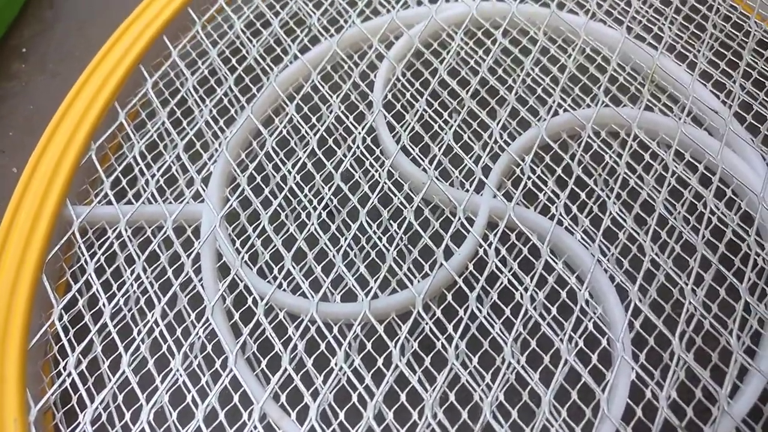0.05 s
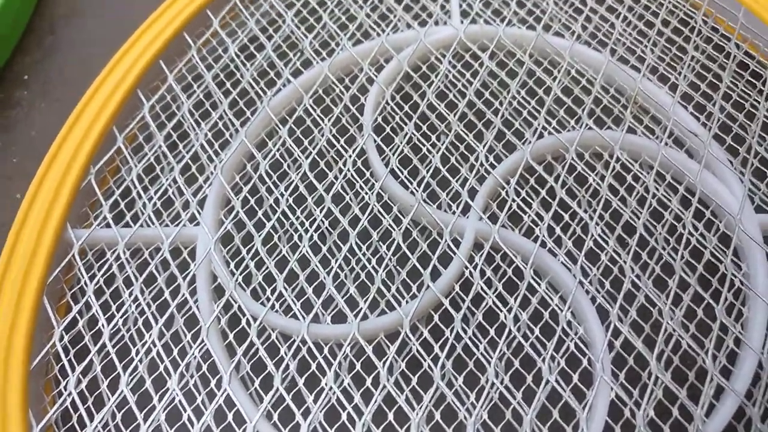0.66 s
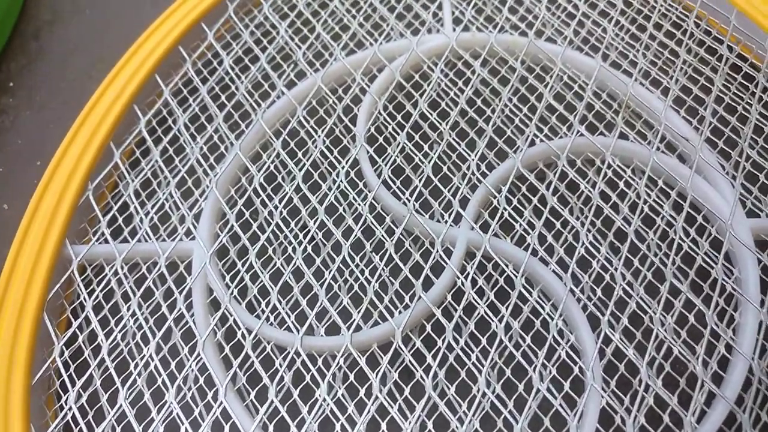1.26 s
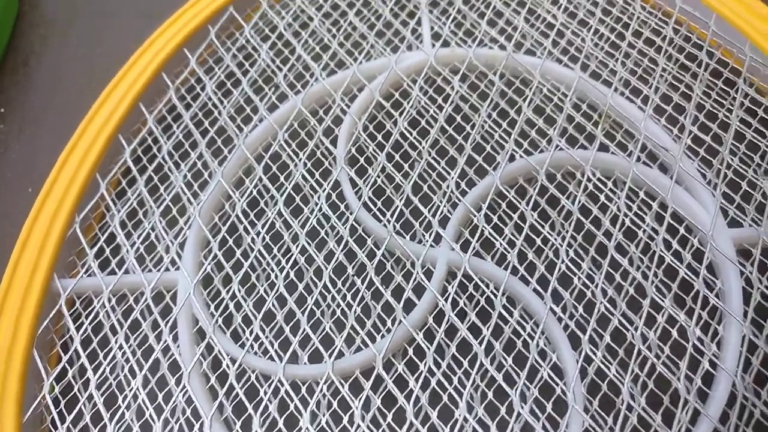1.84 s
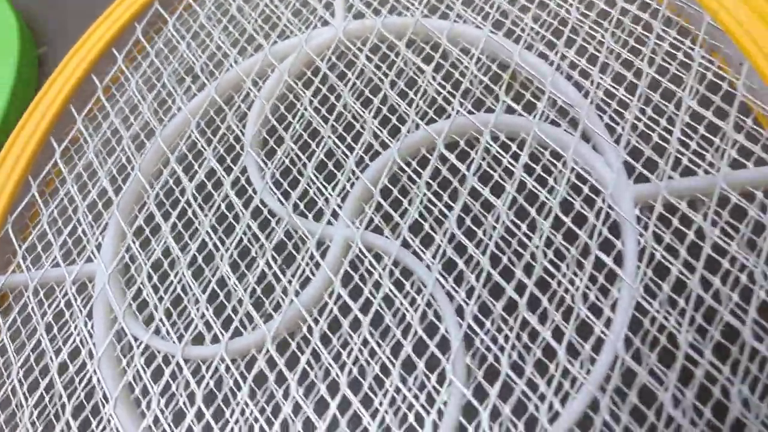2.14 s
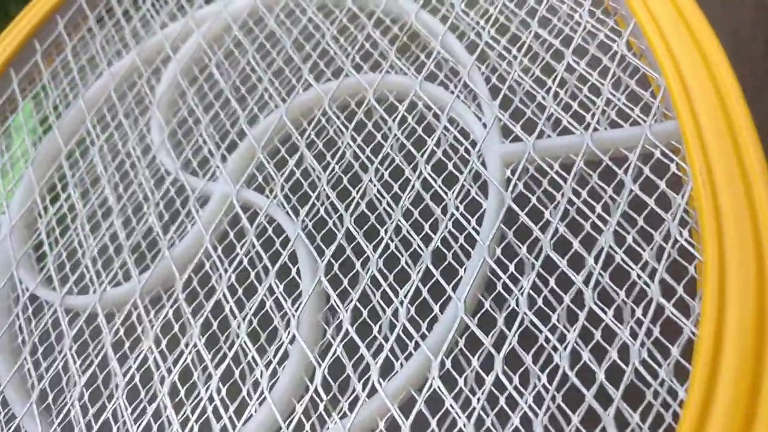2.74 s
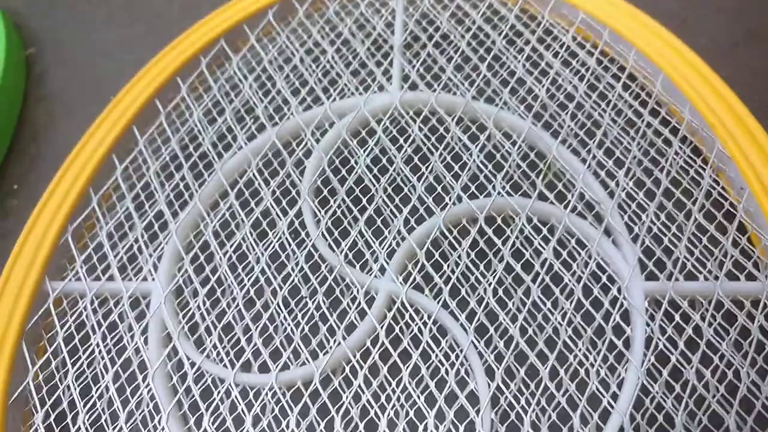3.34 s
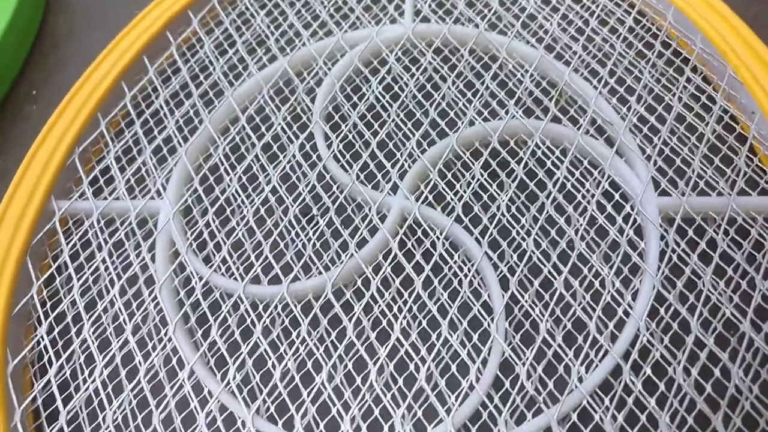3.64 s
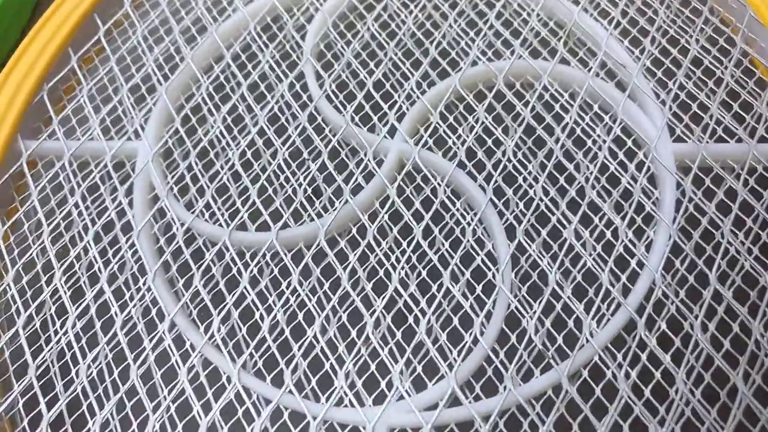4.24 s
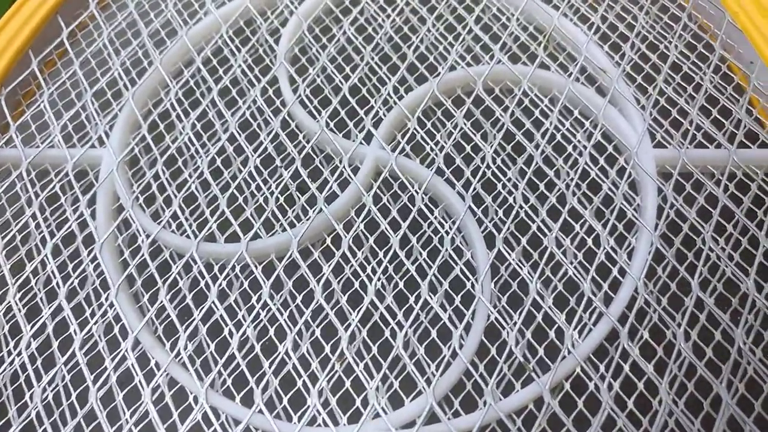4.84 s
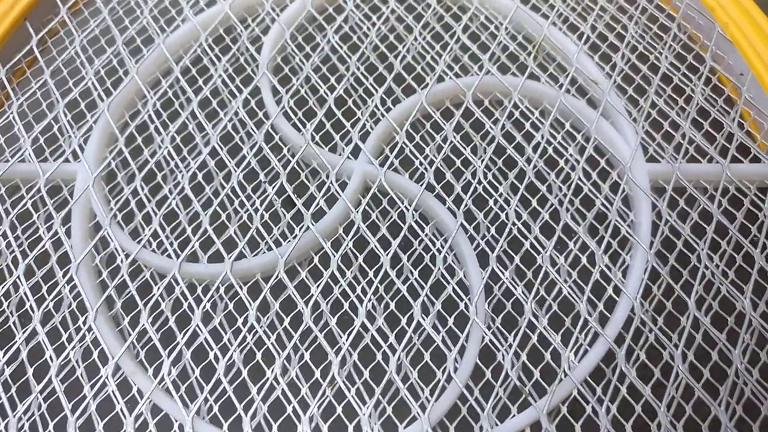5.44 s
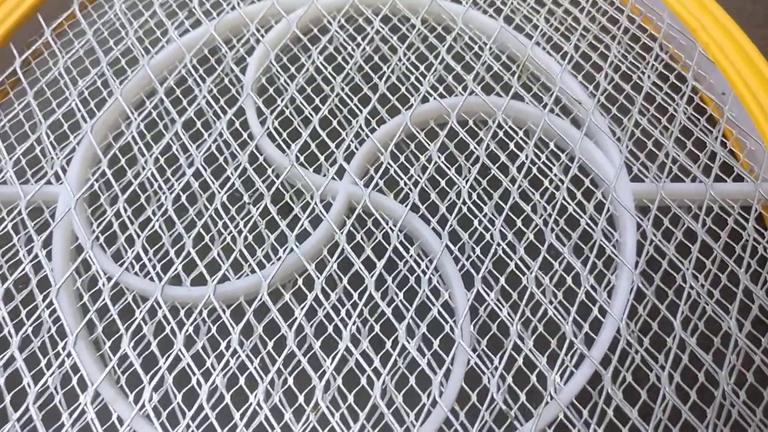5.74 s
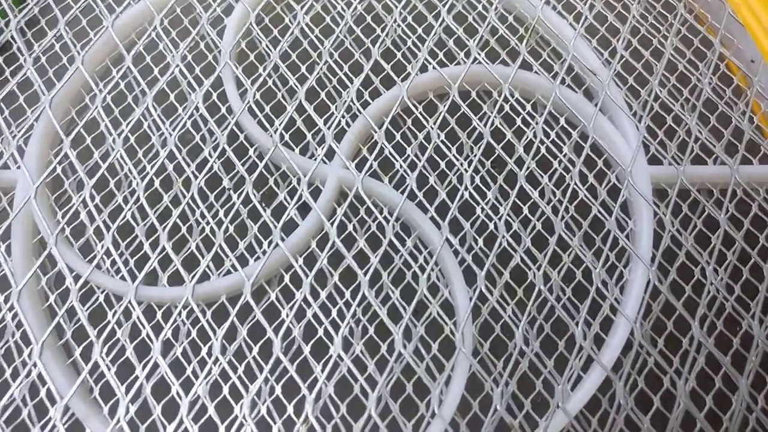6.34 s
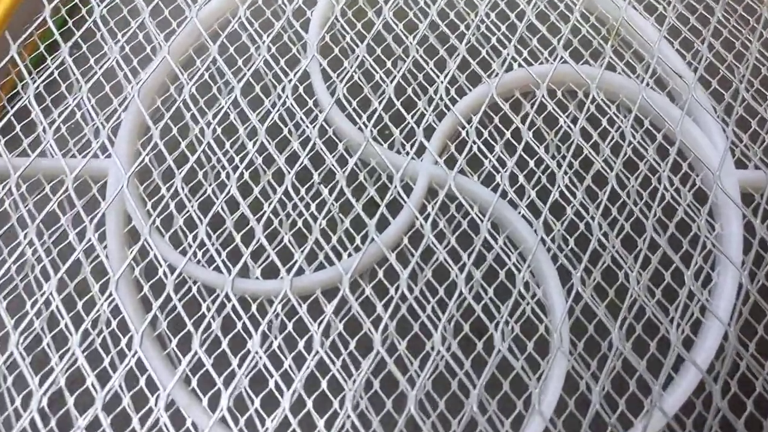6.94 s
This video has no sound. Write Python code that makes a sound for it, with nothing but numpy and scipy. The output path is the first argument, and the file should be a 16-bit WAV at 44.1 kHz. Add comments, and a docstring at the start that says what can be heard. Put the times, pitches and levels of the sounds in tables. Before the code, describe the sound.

An electric fly swatter snaps and pops sharply at irregular intervals, close by in a small, quiet room.

```python
"""Electric fly swatter in a small room

An electric fly swatter, close by, discharges in sharp snaps that ring its wire mesh and flood a
small hard room. In between, weaker sparks pop and tick on the mesh and the plastic frame creaks.
Under them lie a soft room hiss, a low rumble, faint whistles and the hum of a distant engine
that twice gathers speed. The mesh rings on faintly after the loudest snap."""
import sys
import numpy as np
from scipy import signal
from scipy.fft import rfft, irfft, next_fast_len
from scipy.io import wavfile

SR = 44100
rng = np.random.default_rng(int(sys.argv[2]) if len(sys.argv) > 2 else 0)


def wav_out(sig):
    """Save sig, one row per channel (or a flat mono array), as 16-bit PCM at SR to the path in sys.argv[1]."""
    wavfile.write(sys.argv[1], SR, np.round(np.clip(np.atleast_2d(sig).T, -1, 1) * 32767).astype(np.int16))


N = 312669
TIME = np.arange(N) / SR  # seconds since the start
AGE = np.arange(SR // 2) / SR  # seconds since a spark

# tone colours of the room air, the far rumble and a low murmur: (frequency [Hz], level [dB])
AIR_COLOUR = [(150, -34), (250, -11.5), (379, -18.5), (536, -13.5), (842, -15), (1110, -14), (1420, -16),
              (1870, -14.5), (2690, -19.5), (4230, -19), (4940, -24), (5880, -22.5), (7360, -31.5),
              (12600, -22.5), (15800, -26)]
RUMBLE_COLOUR = [(15, -71.5), (24, -35.5), (32, -18.5), (42, -5), (54, -1.5), (68, 4), (98, -8), (150, -27),
                 (400, -100)]
MURMUR_COLOUR = [(50, -55.5), (85, -5.5), (125, 1.5), (188, -6), (249, -6.5), (382, -21), (450, -25),
                 (600, -52), (1000, -110)]
# when each of those grows louder and sinks back: (start [s], rise [s], hold [s], fall [s])
AIR_SWELL = (1.2, 2.3, 1.7, 0.26)
RUMBLE_SWELL = (1.42, 0.51, 3.8, 1.26)
MURMUR_SWELL = (1.75, 0.2, 1.45, 0.55)
# how alike left and right are, for background and echoes: (frequency [Hz], likeness [-1 to 1])
BACKGROUND_LIKENESS = [(60, 0.98), (150, 0.89), (380, 0.93), (950, -0.053), (2380, -0.058), (5980, -0.028),
                       (15000, 0.01)]
ECHO_LIKENESS = [(150, 0.48), (700, 0.36), (1400, 0.15), (2000, -0.0035), (4000, -0.35), (10000, 0.084)]
# faint whistles and, in the third row, the mesh's lingering ring after the loudest snap:
# (start [s], length [s], pitch [Hz], spread [Hz], level [dB])
WHISTLES_AND_RING = [(0.8, 0.092, 1027, 45, -65), (0.85, 0.4, 2280, 202, -65), (3.41, 0.14, 1860, 80, -63),
                     (3.748, .85, 2190, 192, -65)]
# the engine speeding up:
# (loudest moment [s], firing rate then [Hz], speed growth [1/s], firing tone [dB], octave above [dB])
ENGINE_PULLS = [(2.95, 68.53, .11, -66.5, -54), (4.97, 67.04, .175, -50, -54)]
# tone colour of the room's echoes, and the extra colour of a pop's echo: (frequency [Hz], level [dB])
ECHO_COLOUR = [(60, -18), (180, -12), (550, -22), (1050, -12.5), (1400, -0.5), (1820, -0.5), (2100, -0.5),
               (4000, 2.5), (6000, -0.5), (7200, -10), (8800, -8), (11000, -5), (16000, -7.5)]
POP_ECHO_COLOUR = [(1500, 15), (3000, 4), (8000, -7)]
# how long the room echoes: (frequency [Hz], time to fade by 60 dB [s])
ECHO_FADE = [(150, 0.051), (500, 0.15), (1400, 0.22), (4000, 0.17), (8000, 0.16), (15000, 0.14)]
# tone colours of a spark's crack and of its push of hot air: (frequency [Hz], level [dB])
CRACK_COLOUR = [(100, -44.5), (900, -16), (1400, 0), (2500, 5.5), (4000, 4), (6000, -10.5), (7500, -8.5),
                (11000, -12.5), (16000, -11)]
THUMP_COLOUR = [(40, -23.5), (120, -4.5), (240, -2), (450, -3), (620, -2.5), (900, -7), (1500, -35.5),
                (4000, -47.5)]
# ringing of a pop, a snap and the plastic frame, and faint high tones that linger after a snap:
# (pitch [Hz], level [dB], time to fade by 60 dB [s])
POP_TONES = [(1090, -16.5, 0.018), (1420, 1, 0.0097), (2170, -4.5, 0.0097), (2800, -3.5, 0.01),
             (3040, -8.5, 0.028), (4340, -14.5, 0.012)]
SNAP_TONES = [(1340, -13.5, 0.021), (1851, 1.5, 0.029), (2320, -14.5, 0.035), (3780, -13.5, 0.004)]
FRAME_TONES = [(230, -13.5, .016), (740, -1, 0.025), (950, -10.5, .018)]
AFTER_TONES = [(1880, -28.5, .55), (3290, -16, .22), (3999, -17.5, .18), (4290, -7, 0.17)]
# tiny sparks and creaks of the frame: (time [s], level [dB], brightness [dB per octave])
TICKS = [(0.338, -57.5, 0), (2.4973, -47.5, 4.5), (2.607, -57, -3), (2.8948, -51.5, 4),
         (2.9123, -50.5, 4.5), (3.184, -49.5, 1), (3.5080, -52, -3.5), (3.584, -54.5, -1),
         (3.7903, -50.5, 1.5), (4.621, -47.5, 0), (4.6400, -53, -3), (6.8778, -54, 4.5)]
# dull pops on the mesh: (time [s], level [dB])
POPS = [(5.295, -37), (5.4033, -12), (5.6494, -33.5), (5.7846, -41.5), (5.8812, -17.5)]
# full discharges:
# (time [s], crack [dB], ring [dB], thump [dB], echo [dB], time the noisy tail stays level [s])
SNAPS = [(0.5193, -19.5, -24, -27, -26, 0.029), (3.2687, -9, -33, -36, -17, 0.05),
         (3.2789, -13, -31, -32, -30, 0.0057), (3.2869, -22, -13, -26.5, -40, 0.0084),
         (3.3782, -31, -46, -59, -41, 0.031), (4.1116, -15, -12, -22, -21.5, 0.026),
         (4.1800, -45.5, -31, -37, -34.5, 0.037), (5.513, -23.5, -12.5, -42.5, -33, .0065),
         (5.5360, -44.5, -20.5, -45, -61, .01), (5.8522, -14, -15.5, -25.5, -26.5, 0.017)]
# how much louder the swatter is on the left: (frequency [Hz], left minus right [dB])
LEFT_BOOST = [(100, 9), (400, 3), (1300, 1), (2000, -6), (4200, -3.5), (6500, 1), (8500, 7), (11000, 14.5),
              (16000, 10.5)]


def gain(db):
    """Turn decibels into a number to multiply by."""
    return 10 ** (np.asarray(db) / 20)


def normalised(x):
    """Scale a signal to an average strength (rms) of 1."""
    return x / np.sqrt(np.mean(x ** 2) + 1e-20)


def look_up(table, hz):
    """Read between the rows of a (frequency, value) table, spacing octaves evenly."""
    frequencies, values = np.transpose(table)
    return np.interp(np.log(hz + 1), np.log(frequencies + 1), values)


def filtered(x, response):
    """Multiply each frequency in x by response(hz)."""
    n = x.shape[-1]
    padded = next_fast_len(n + SR // 10)
    return irfft(rfft(x, padded) * response(np.fft.rfftfreq(padded, 1 / SR)), padded)[..., :n]


def coloured(x, colour, size=2048):
    """Give x a tone colour with a minimum-phase filter, so that nothing sounds early."""
    cepstrum = irfft(np.log(gain(look_up(colour, np.fft.rfftfreq(size, 1 / SR)))))
    cepstrum[1:size // 2] *= 2  # fold the late half onto the early half
    cepstrum[size // 2 + 1:] = 0
    pulse = irfft(np.exp(rfft(cepstrum)))
    return signal.fftconvolve(x, pulse / np.linalg.norm(pulse))[:len(x)]


def brightened(x, db_per_octave):
    """Tilt x towards the treble; a negative tilt dulls it."""
    return filtered(x, lambda hz: gain(db_per_octave * np.log2((hz + 200) / 4000)))


def stereo_noise(n, colour, likeness=BACKGROUND_LIKENESS):
    """Coloured noise: one part is the same on both sides, the other is opposite."""
    def blend(hz):
        angle = np.arccos(look_up(likeness, hz)) / 2
        return gain(look_up(colour, hz)) * [np.cos(angle), np.sin(angle)]
    same, opposite = filtered(rng.standard_normal((2, n)), blend)
    return normalised(np.array([same + opposite, same - opposite]))


def from_left(x, lag_s=0.00017):
    """A close sound reaches the left side first."""
    return np.array([x, filtered(x, lambda hz: np.exp(-2j * np.pi * hz * lag_s))])


def add(track, start, sound):
    """Mix a sound into the track at a start time in seconds."""
    part = track[:, round(start * SR):][:, :sound.shape[-1]]
    part += sound[..., :part.shape[-1]]


def swell(start, rise, hold, fall):
    """A curve from 0 up to 1 and back."""
    return np.interp(TIME, start + np.cumsum([0, rise, hold, fall]), [0, 1, 1, 0])


def room_hiss(split_hz=8000):
    """Soft room air and a fine high hiss swell together."""
    air = normalised(filtered(stereo_noise(N, AIR_COLOUR), lambda hz: hz < split_hz))
    hiss = normalised(filtered(stereo_noise(N, AIR_COLOUR), lambda hz: hz >= split_hz))
    lift = swell(*AIR_SWELL)
    return gain(-62 + 2 * lift) * air + gain(-69 + 4.5 * lift) * hiss


def far_rumble(sink_db_per_s=0.55, bump_hz=6.1):
    """A rumble and a low murmur swell and slowly sink; the murmur grows bumpy as it swells."""
    bumps_db = normalised(filtered(rng.standard_normal(N), lambda hz: np.exp(-(hz / bump_hz) ** 2)))
    rumble = gain(-57 + 3 * swell(*RUMBLE_SWELL)) * stereo_noise(N, RUMBLE_COLOUR)
    murmur = gain(-60 + (4 + bumps_db) * swell(*MURMUR_SWELL)) * stereo_noise(N, MURMUR_COLOUR)
    return gain(-sink_db_per_s * TIME) * (rumble + murmur)


def whistles_and_ring():
    """Narrow bands of noise fade in and out: faint whistles and the mesh's lingering ring."""
    out = np.zeros((2, N))
    for start, length, pitch, spread, db in WHISTLES_AND_RING:
        n = round(length * SR)
        band = filtered(rng.standard_normal((2, n)), lambda hz: np.exp(-((hz - pitch) / spread) ** 2))
        add(out, start, gain(db) * normalised(band) * signal.windows.tukey(n))
    return out


def engine(rise_db_per_s=11.5, fade_db_per_s=14.5):
    """Each pull speeds up, swells and fades; only the two lowest tones come through the walls."""
    out = np.zeros(N)
    for loudest, firing_hz, growth, firing_db, octave_db in ENGINE_PULLS:
        t = TIME - loudest
        phase = 2 * np.pi * np.cumsum(firing_hz * np.exp(growth * t)) / SR
        effort = gain(np.minimum(rise_db_per_s * t, -fade_db_per_s * t))
        out += effort * (gain(firing_db) * np.sin(phase) + gain(octave_db) * np.sin(2 * phase))
    return np.sqrt(2) * out


def room_echo(hold_s, sag_db=1.5, rise_s=0.0028, uneven_db=3.5):
    """A noisy tail stays almost level for the hold time, then each band dies at its own speed."""
    noise = stereo_noise(len(AGE), ECHO_COLOUR, ECHO_LIKENESS)
    hz, t, bands = signal.stft(noise, SR, nperseg=256)
    fall_db = 60 * np.maximum(t - hold_s, 0) / look_up(ECHO_FADE, hz)[:, None]
    fall_db += sag_db * np.minimum(t / hold_s, 1)
    walls_db = uneven_db * rng.standard_normal((len(hz), 1))  # walls favour some bands, cancel others
    _, tail = signal.istft(bands * gain(walls_db - fall_db), SR, nperseg=256)
    return tail[:, :len(AGE)] * (1 - np.exp(-AGE / rise_s))


def ring(tones, rise_s):
    """A set of fading tones, their levels a little different each time."""
    sound = np.zeros(len(AGE))
    for hz, db, fade_s in tones:
        sound += gain(db + rng.normal(0, 1) - 60 * AGE / fade_s) * np.sin(2 * np.pi * hz * AGE)
    return sound * (1 - np.exp(-AGE / rise_s))


def mesh_resonance(echo, pitch_hz=1825, width_hz=120):
    """Returning sound keeps the mesh ringing, as strongly as the echo that drives it."""
    rung = filtered(echo, lambda hz: 1j * hz * width_hz / (pitch_hz ** 2 - hz ** 2 + 1j * hz * width_hz))
    return rung * np.linalg.norm(echo) / np.linalg.norm(rung)


def crack(length_s):
    """A spark jumps: a moment of bright noise."""
    fade = np.exp(-(AGE / length_s) ** 2)
    burst = rng.standard_normal(len(AGE)) * fade
    burst *= np.linalg.norm(fade) / np.linalg.norm(burst)
    return coloured(burst, CRACK_COLOUR)


def ticks():
    """Tiny sparks leak between the wires; the longer, duller sounds are the frame creaking."""
    out = np.zeros((2, N))
    for start, db, brightness in TICKS:
        direct = from_left(crack(length_s=0.011 * np.exp(-0.12 * brightness)))
        echo = gain(-15) * room_echo(hold_s=0.006)
        add(out, start, gain(db) * brightened(direct + echo, brightness))
    return out


def pops():
    """Weak discharges ring briefly and hardly wake the room."""
    out = np.zeros((2, N))
    for start, db in POPS:
        direct = ring(POP_TONES, rise_s=0.00095) + gain(-17) * crack(length_s=0.0032)
        echo = filtered(room_echo(hold_s=0.005), lambda hz: gain(look_up(POP_ECHO_COLOUR, hz)))
        add(out, start, gain(db) * (from_left(direct) + gain(-38) * echo))
    return out


def snaps(push_s=0.0004):
    """The stored charge empties across the mesh: a crack, a push of hot air, ringing and echoes."""
    out = np.zeros((2, N))
    push = coloured(np.exp(-AGE / push_s), THUMP_COLOUR)
    for start, crack_db, ring_db, thump_db, echo_db, hold_s in SNAPS:
        spark = gain(crack_db) * crack(length_s=0.0026)
        thump = gain(thump_db) * push / np.abs(push).max()
        ringing = gain(ring_db) * ring(SNAP_TONES, rise_s=0.0015)
        knock = gain(thump_db - 2) * ring(FRAME_TONES, rise_s=0.0011)
        add(out, start, from_left(spark + thump + ringing + knock))
        echo = brightened(room_echo(hold_s), 2.5 + 0.1161 * echo_db)  # louder echoes are brighter
        mesh = gain(-7.5) * mesh_resonance(echo[0])
        after_tones = gain(-2) * ring(AFTER_TONES, rise_s=0.0083)
        add(out, start, gain(echo_db) * (echo + from_left(mesh + after_tones)))
    return out


def scene():
    """The swatter over its background; the left side faces it and catches more of its top treble."""
    sparks = snaps() + pops() + ticks()
    swatter = filtered(sparks, lambda hz: gain(np.outer([0.5, -0.5], look_up(LEFT_BOOST, hz))))
    return room_hiss() + far_rumble() + whistles_and_ring() + engine() + swatter


def record(dry, ceiling=0.68, top_hz=15950, edge_hz=500):
    """Round off the tallest peaks and cut the very highest treble."""
    rounded = dry / (1 + (dry / ceiling) ** 4) ** 0.25
    ramp = lambda hz: np.clip((top_hz - hz) / edge_hz + 0.5, 0, 1)
    return filtered(rounded, lambda hz: np.sin(np.pi / 2 * ramp(hz)) ** 2)


dry = scene()
out = record(dry)
wav_out(out)
```